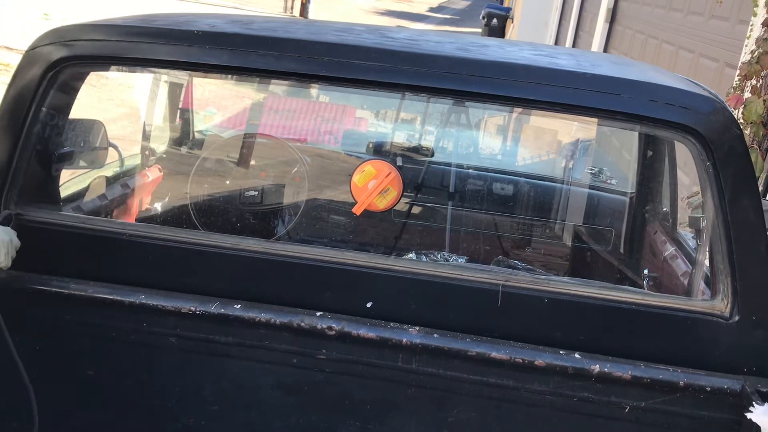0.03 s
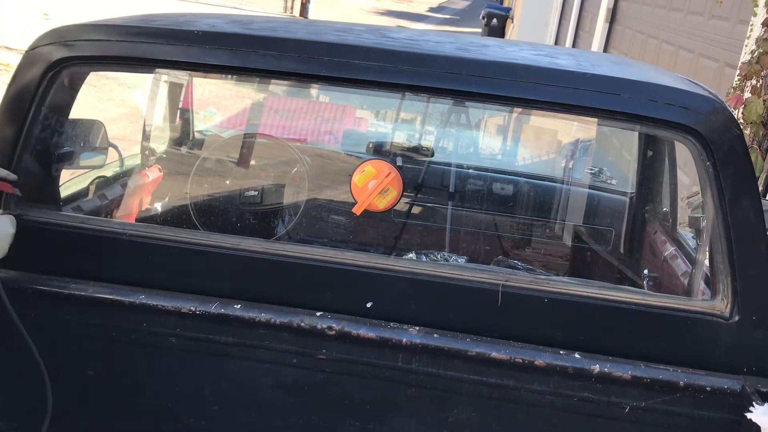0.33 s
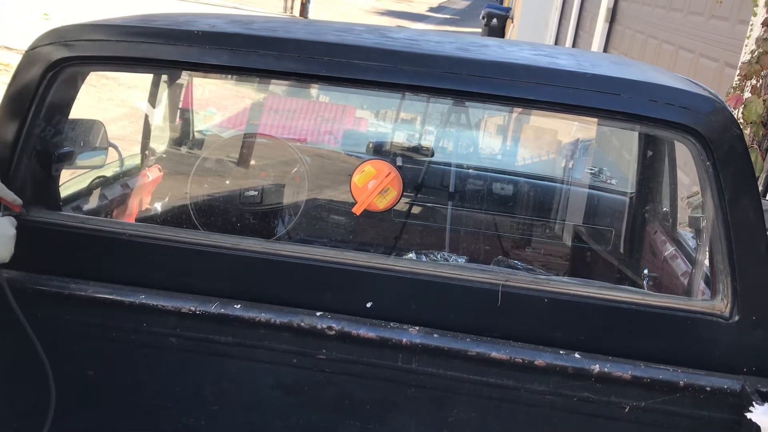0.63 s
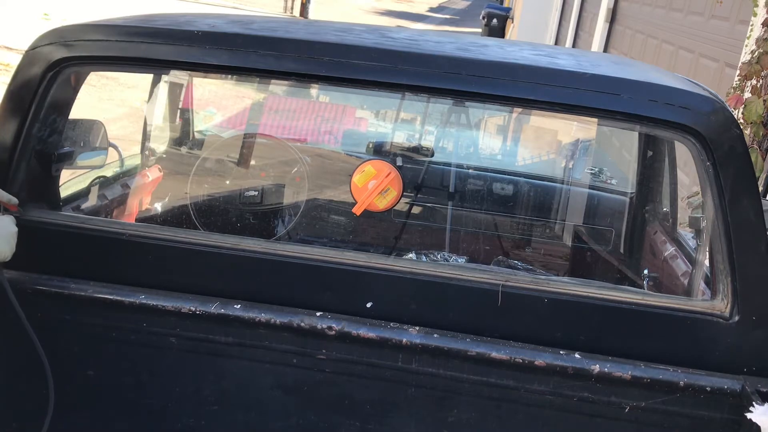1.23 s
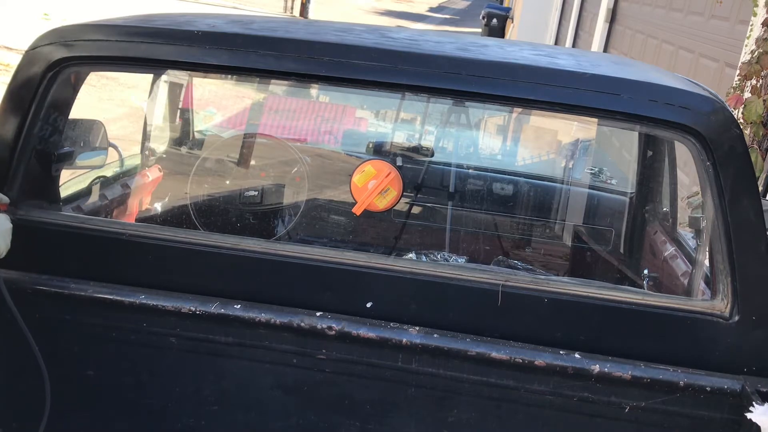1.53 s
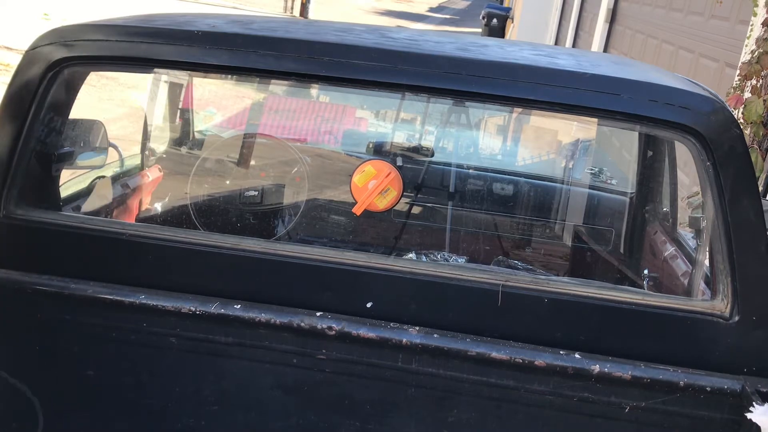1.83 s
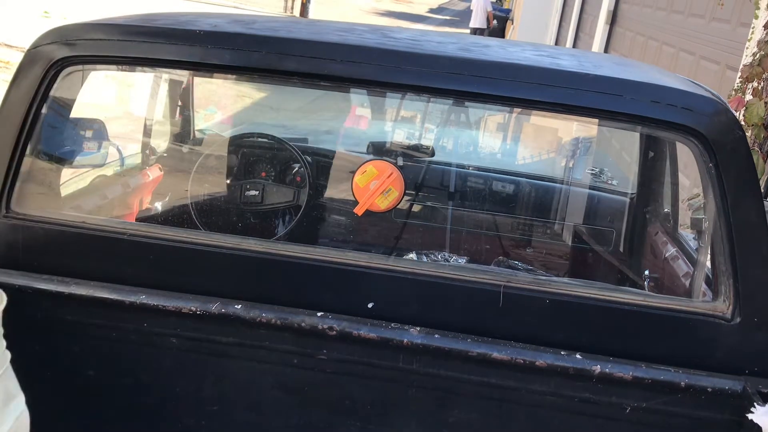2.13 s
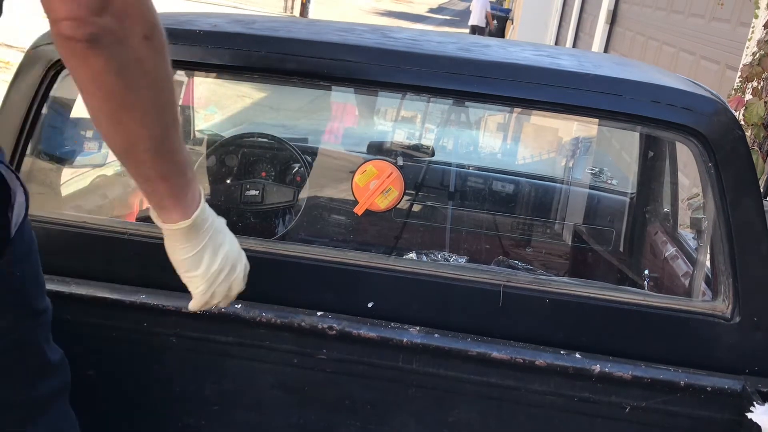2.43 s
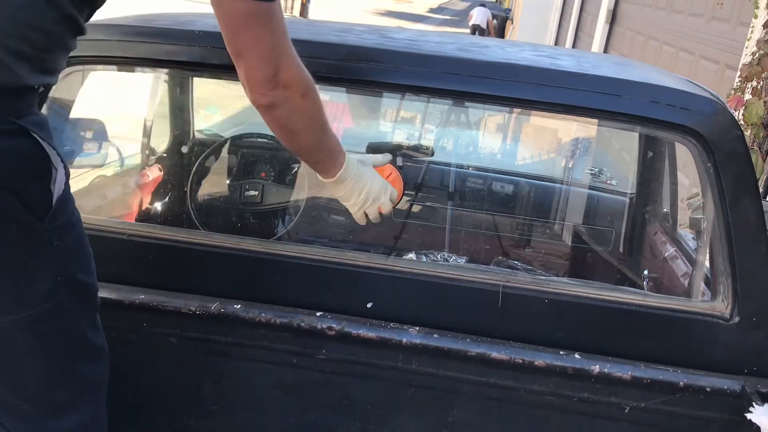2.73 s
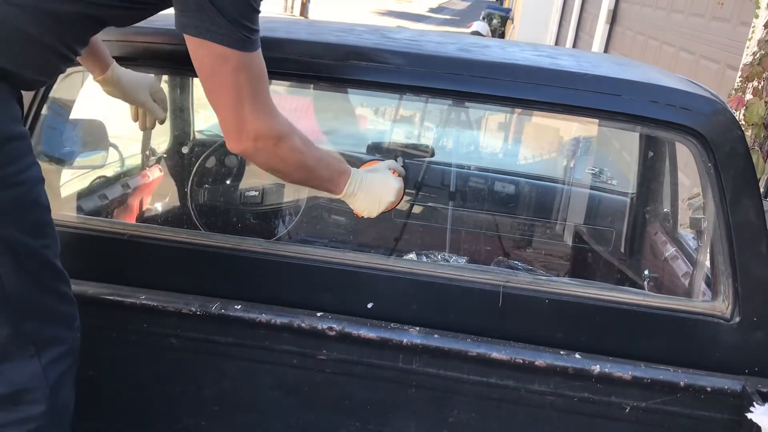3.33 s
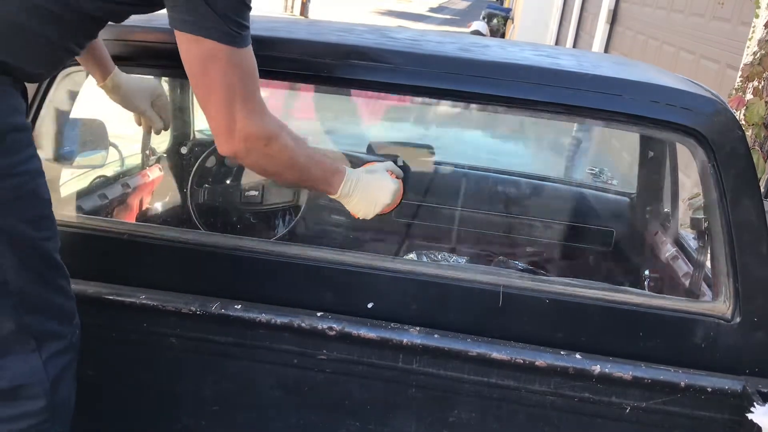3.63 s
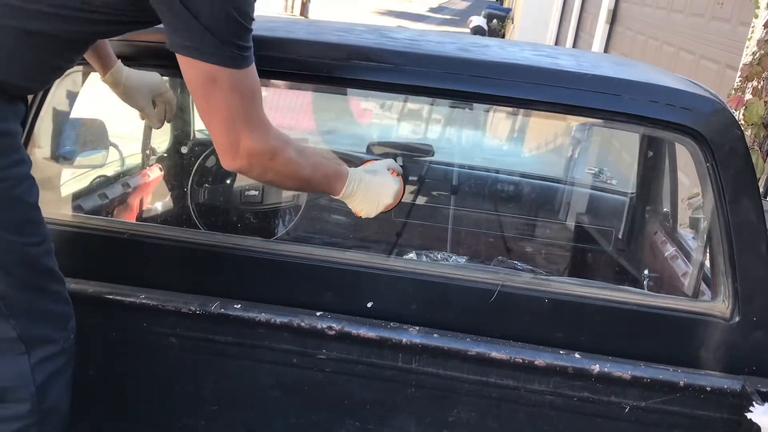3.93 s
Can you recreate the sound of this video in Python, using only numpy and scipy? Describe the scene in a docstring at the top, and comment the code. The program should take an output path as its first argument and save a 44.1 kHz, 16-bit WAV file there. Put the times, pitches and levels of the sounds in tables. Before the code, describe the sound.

Rubber window gasket rubbing and ticking, then gritty shuffling and thumps on a steel truck bed.

```python
"""Hissy rubbing, squeaks and ticks: a gloved worker picks at the rubber gasket of a pickup's rear window.
The rubber sticks and slips, then lets go with cracks that ring the frame. He shifts across the steel
load bed: cloth and soles drag, grit snaps, the bed rumbles under his weight and one heavy step makes
the panels boom. Outdoors, with a distant town behind."""
import sys
import numpy as np
from scipy import signal
from scipy.fft import rfft, irfft
from scipy.io import wavfile
from scipy.ndimage import uniform_filter1d

SR = 44100
rng = np.random.default_rng(int(sys.argv[2]) if len(sys.argv) > 2 else 0)


def master_out(mix):
    """Clip the mix to full scale and print it as 16-bit PCM to the path in sys.argv[1]."""
    frames = np.transpose(np.atleast_2d(mix))
    ceiling = np.clip(frames, -1, 1)
    pcm = np.round(ceiling * 32767).astype(np.int16)
    wavfile.write(sys.argv[1], SR, pcm)


N = 176400
TOP_HZ = 15850


def undb(db):
    """Decibels to gain."""
    return 10 ** (np.asarray(db) / 20)


def unit(x):
    """Scale to rms 1."""
    return x / np.sqrt(np.mean(x ** 2))


def clock():
    """Sample times [s]."""
    return np.arange(N) / SR


def log_bins(x):
    """Log frequency of each FFT bin."""
    return np.log(np.maximum(np.fft.rfftfreq(len(x), 1 / SR), 1))


def colour(x, points):
    """Filter by (frequency [Hz], level [dB]) points; rms 1."""
    hz, db = np.array(points).T
    return unit(irfft(rfft(x) * undb(np.interp(log_bins(x), np.log(hz), db)), len(x)))


def bands(x, centres_hz):
    """Split into overlapping bands that sum to x."""
    spectrum, log_hz = rfft(x), log_bins(x)
    return [irfft(spectrum * np.interp(log_hz, np.log(centres_hz), weights), len(x))
            for weights in np.eye(len(centres_hz))]


def soften(x, hz):
    """First-order low-pass."""
    return signal.sosfilt(signal.butter(1, hz, fs=SR, output="sos"), x)


def fade(t, t60):
    """Exponential decay, 60 dB in t60."""
    return np.exp(-np.log(1000) * np.minimum(t / t60, 10))


def walk(rate_hz):
    """Smooth random wander, rms 1."""
    hold = int(SR / rate_hz)
    stairs = np.repeat(rng.standard_normal(N)[:N // hold + 1], hold)
    return unit(uniform_filter1d(stairs, hold)[:N])


def grains(per_s, spread_db):
    """Tiny slips at random moments: many weak, a few strong."""
    impulses = (rng.random(N) < per_s / SR) * rng.choice([-1, 1], N)
    return impulses * undb(spread_db * np.minimum(rng.exponential(size=N), 2 * np.pi))


def ring(modes, t):
    """Decaying modes of a struck object."""
    return sum(undb(db) * np.sin(2 * np.pi * hz * t) * fade(t, t60) for hz, db, t60 in modes)


def add(out, at_s, x):
    """Mix x in at a time."""
    i = int(at_s * SR)
    out[i:i + len(x)] += x[:N - i]


def stroke(start_s, rise_s, hold_s, t60):
    """Speed of one slide: builds, holds, dies away."""
    t = clock() - start_s
    return np.clip(t / rise_s, 0, 1) * fade(np.maximum(t - rise_s - hold_s, 0), t60)


def patchy(x, depth_db=2.7):
    """The contact keeps changing, so each treble band swells and shrinks on its own."""
    centres_hz = np.geomspace(1500, 16000, 16)
    return unit(sum(band * undb(depth_db * walk(rate_hz=45)) for band in bands(x, centres_hz)))


def snap(t60, centre_hz):
    """One bit of grit cracks: a short, bright burst with a faint echo."""
    t, hz = clock()[:SR // 8], np.geomspace(100, TOP_HZ, 20)
    hump_db = -20 * np.log10(1 + np.log2(hz / centre_hz) ** 2)
    burst = colour(rng.standard_normal(len(t)), np.c_[hz, hump_db])
    attack = np.minimum(t / (0.08 * t60), 1)
    echo = undb(-21) * fade(t, t60=0.06)
    return burst * attack * (fade(t, t60) + echo)


def crackles(speed, per_s=75):
    """Fine grit snaps at random, varied in size and pitch; it stands out most in slow slides."""
    out = np.zeros(N)
    for i in rng.integers(N, size=int(per_s * N / SR)):
        size, pitch = np.clip(rng.standard_normal(2), -2, 2)
        gain = speed[i] ** 0.7 * undb(-2.5 + 4 * size)
        add(out, i / SR, gain * snap(t60=0.008, centre_hz=8500 * 2 ** (pitch / 2)))
    return out


def air():
    """Distant town, gently wavering."""
    # town spectrum (frequency [Hz], level [dB])
    spectrum = [(20, -19), (55, 3.5), (100, -7), (240, -1), (420, -10.5), (1000, -12), (2000, -24),
                (4500, -37), (16000, -48)]
    return colour(rng.standard_normal(N), spectrum) * undb(-46.5 + 0.79 * walk(rate_hz=5.5))


def gasket():
    """The glove rubs along the rubber in fine, dense slips, with some crackle."""
    # glove strokes (start [s], rise [s], hold [s], t60 [s], level [dB])
    rubs = [(.0, 0.035, 0.28, 0.4, -45.5), (0.378, 0.059, 0.012, 0.44, -35.5),
            (1.078, 0.025, 0.036, 0.43, -55), (1.293, 0.023, 0.025, 0.082, -59.5)]
    # friction spectrum (frequency [Hz], level [dB])
    spectrum = [(1900, -10.5), (2740, -1.5), (4930, -9), (6980, -7), (9210, -8.5), (10500, -13),
                (14500, -15.5), (16000, -29)]
    slips = grains(per_s=20000, spread_db=1.5) * undb(1.5 * walk(rate_hz=120))
    speed = np.sqrt(sum((undb(db) * stroke(*shape)) ** 2 for *shape, db in rubs))
    hiss = patchy(colour(slips, [(200, -18), *spectrum]))
    return hiss * speed + undb(-4) * crackles(speed)


def squeaks():
    """The rubber briefly sticks and slips at a rough, wavering pitch."""
    # squeaks (centre [s], half-width [s], pitch [Hz], level [dB])
    events = [(0.049, 0.017, 3180, -43), (0.147, 0.011, 1990, -45), (0.192, 0.022, 2600, -36.5),
              (1.736, 0.017, 2470, -38.5)]
    waver = 1 + 0.11 * walk(rate_hz=500)
    grip = undb(2.2 * walk(rate_hz=300))
    out = np.zeros(N)
    for at_s, width_s, hz, db in events:
        swell = np.exp(-((clock() - at_s) / width_s) ** 2)
        out += undb(db) * swell * grip * np.sin(2 * np.pi * np.cumsum(hz * waver) / SR)
    return out


def ticks(rise_s=0.0015):
    """The gasket lets go with a short crack that rings the window frame."""
    # gasket releases (time [s], level [dB], t60 [s], relative ring [dB])
    releases = [(.107, -33.5, 0.033, -2.5), (.264, -36.5, 0.082, -17), (0.895, -42, 0.045, 7.5),
                (1.269, -36, 0.014, -4), (1.455, -47.5, 0.15, -10), (1.512, -45, 0.033, -3),
                (1.591, -46, 0.016, -18), (1.654, -42.5, 0.021, -9), (1.667, -25, 0.055, 1.5),
                (1.795, -21, 0.012, 3), (2.138, -32.5, 0.043, -25)]
    # crack spectrum (frequency [Hz], level [dB])
    spectrum = [(300, -12), (1500, -2), (3600, 5), (4500, -0.5), (10500, -4.5), (13000, -3.5), (16000, -14)]
    # window frame modes (frequency [Hz], level [dB], t60 [s])
    frame_modes = [(2450, 6, 0.018), (2633, 1, 0.025), (3115, -10, 0.02), (4996, -13.5, 0.031)]
    out, t = np.zeros(N), clock()[:SR // 4]
    tail = undb(-9.5) * fade(t, t60=0.12)
    for at_s, db, t60, ring_db in releases:
        crack = colour(rng.standard_normal(len(t)), spectrum) * (fade(t, t60) + tail)
        frame = undb(ring_db) * ring(frame_modes, t)
        add(out, at_s, undb(db) * (crack + frame) * np.minimum(t / rise_s, 1))
    return out


def sheet(t):
    """Crowded modes of sheet steel: the treble dies first, a low wash lingers."""
    # sheet steel bands (centre [Hz], level [dB], t60 [s])
    steel = [(65, -3.5, 0.16), (270, -5.5, 0.42), (540, -10, 0.29), (1010, -6, 0.13), (1860, -11.5, 0.12),
             (3560, -8.5, 0.074), (15800, -24, 0.14)]
    hz, db, t60s = np.array(steel).T
    noise = colour(rng.standard_normal(len(t)), [(28, -48), *zip(hz, db)])
    early = sum(band * fade(t, t60) for band, t60 in zip(bands(noise, hz), t60s))
    wash = undb(-16.5) * soften(noise, hz=890) * fade(t, t60=0.76)
    return early + wash


def steps(panel_rise_s=0.0018, boom_rise_s=0.0061):
    """Each step clatters and rings the steel panels; the weight behind it makes the whole bed boom."""
    # steps and knocks (time [s], level [dB], contact cut-off [Hz], rise [s], relative boom [dB])
    impacts = [(1.271, -36.5, 900, 0.002, -22), (1.669, -23.5, 795, 0.0019, -13.5),
               (1.723, -32.5, 1500, 0.0059, -28), (2.153, -37.5, 99, 0.0075, -2),
               (2.766, -32, 100, 0.031, 6.5), (2.996, -25.5, 290, 0.0037, -17),
               (3.306, -29.5, 199, 0.003, -3), (3.449, -22, 604, 0.034, -10),
               (3.493, -27.5, 920, 0.004, -14), (3.545, -24, 3870, 0.00079, -32),
               (3.612, -10, 2050, 0.013, -23.5), (3.633, -7.5, 3240, 0.0006, -3.5),
               (3.785, -16, 222, 0.013, -13.5)]
    # bed panel modes (frequency [Hz], level [dB], t60 [s])
    panel_modes = [(131.7, -17.5, 0.72), (190.2, -18.5, 0.35), (267.4, -3, 0.12), (349.7, -12.5, 0.67),
                   (376, -16, 0.34), (446.5, -20, 0.4), (605, -11.5, 0.17), (940, -18, .24),
                   (1153, -17, 0.11), (1470, -17, .16)]
    # lowest modes of the whole bed (frequency [Hz], level [dB], t60 [s])
    boom_modes = [(68.4, 10, 0.14), (81.7, -12, 2.55)]
    out, t = np.zeros(N), clock()[:SR]
    boom = undb(2) * ring(boom_modes, t) * (1 - np.exp(-t / boom_rise_s))
    for at_s, db, cut_hz, rise_s, boom_db in impacts:
        # each spot rings differently
        modes = [(hz, mode_db + 2 * rng.standard_normal(), t60) for hz, mode_db, t60 in panel_modes]
        panels = undb(-0.5) * ring(modes, t) * (1 - np.exp(-t / panel_rise_s))
        blow = sheet(t) - panels + undb(boom_db) * boom
        add(out, at_s, undb(db) * soften(blow * np.minimum(t / rise_s, 1), cut_hz))
    return out


def rumble():
    """The bed flexes and rumbles as the weight moves."""
    # rumble envelope (time [s], level [dB])
    envelope = [(1.6, -52.5), (1.7, -38.5), (1.95, -38.5), (2.3, -51), (2.45, -39), (2.7, -48.5),
                (3.4, -42), (3.48, -29)]
    # rumble spectrum (frequency [Hz], level [dB])
    spectrum = [(25, -25.5), (65, -4), (88, -9.5), (260, -15.5), (900, -38.5), (3000, -55)]
    times_s, db = np.array(envelope).T
    return colour(rng.standard_normal(N), spectrum) * undb(np.interp(clock(), times_s, db))


def drag():
    """Cloth and soles slide over the gritty bed, hissing and crackling; pressure adds a lower scrape."""
    # slides (start [s], rise [s], hold [s], t60 [s], level [dB], relative scrape [dB])
    slides = [(1.664, 0.011, 0.13, 0.044, -48, 4.5), (1.72, .008, 0.014, 0.34, -51, 15),
              (1.824, 0.04, 0.087, 0.63, -29.5, -8), (2.262, 0.11, 0.21, 0.2, -28.5, -13.5),
              (2.402, 0.02, 0.011, 0.28, -33, 0), (2.575, .02, 0.098, 0.42, -47.5, -4),
              (2.756, 0.071, 0.075, 0.74, -30, -15), (2.845, 0.0086, 0.048, 0.15, -32, -3),
              (2.948, 0.045, 0.038, 0.48, -27.5, -8), (3.089, 0.061, 0.067, 0.17, -34, -8),
              (3.23, 0.0095, 0.2, 0.046, -66.5, 6), (3.442, 0.002, 0.12, 1, -45, 4),
              (3.834, 0.12, 0.13, 0.23, -45.5, -15)]
    # hiss spectrum (frequency [Hz], level [dB])
    hiss_spectrum = [(1290, -57), (2200, -13.5), (2620, -3.5), (4030, -1), (4880, -5.5), (6800, 2),
                     (7840, -6), (9600, 1.5), (10400, -10), (11300, -2.5), (15800, -8)]
    # scrape spectrum (frequency [Hz], level [dB])
    scrape_spectrum = [(100, -24), (270, -0.5), (450, -7.5), (800, -0.5), (1700, 0.5), (5000, -11.5)]
    slips = grains(per_s=12000, spread_db=2.4) * undb(1.2 * walk(rate_hz=150))
    power = np.array([(undb(db) * stroke(*shape)) ** 2 for *shape, db, _ in slides])
    pressure = undb([scrape_db for *_, scrape_db in slides]) ** 2
    speed = np.sqrt(sum(power))
    hiss = patchy(colour(slips, [(100, -40), *hiss_spectrum]))
    scrape = colour(slips, [*scrape_spectrum, (16000, -35)])
    return hiss * speed + crackles(speed) + scrape * np.sqrt(pressure @ power)


def snaps():
    """Larger bits of grit crack underfoot, one by one."""
    # grit snaps (time [s], level [dB], t60 [s], centre [Hz])
    grit = [(2.005, -20, 0.046, 6160), (2.311, -18.5, 0.012, 7110), (2.334, -15.5, 0.014, 6300),
            (2.42, -13, .035, 6160), (2.583, -13.5, 0.011, 6450), (2.777, -21.5, 0.014, 8000),
            (2.814, -15.5, 0.02, 6900), (2.856, -13.5, 0.034, 6100), (2.991, -8, 0.038, 6900),
            (3.031, -12.5, 0.013, 8000), (3.129, -18, 0.013, 6950), (3.157, -14.5, 0.0073, 7450),
            (3.222, -18, 0.0081, 9900), (3.263, -26.5, .014, 6550), (3.419, -33.5, .012, 9000),
            (3.447, -32, 0.034, 12000), (3.558, -22, .02, 12000), (3.621, -15.5, .012, 13000),
            (3.734, -23, 0.052, 7300), (3.77, -17.5, .018, 10600), (3.994, -22.5, 0.057, 6700)]
    out = np.zeros(N)
    for at_s, db, t60, centre_hz in grit:
        add(out, at_s, undb(db) * snap(t60, centre_hz))
    return out


def scene():
    """All sources in mono; the level dips briefly once."""
    dip_s, dip_width_s, dip_db = 1.832, 0.012, -17
    dip = undb(dip_db * np.exp(-((clock() - dip_s) / dip_width_s) ** 2))
    mix = gasket() + squeaks() + ticks() + drag() + snaps() + steps() + rumble() + air()
    return (dip * mix)[None]


def record(dry):
    """Round the highest peaks and cut the top treble."""
    rounded = dry / (1 + dry ** 6) ** (1 / 6)
    return signal.sosfilt(signal.ellip(10, 0.2, 80, TOP_HZ, fs=SR, output="sos"), rounded)


dry = scene()
out = record(dry)
master_out(out)
```